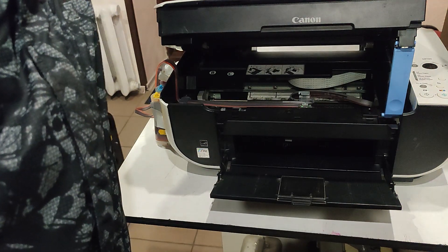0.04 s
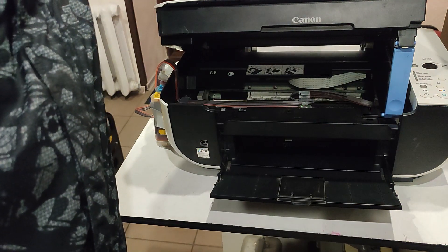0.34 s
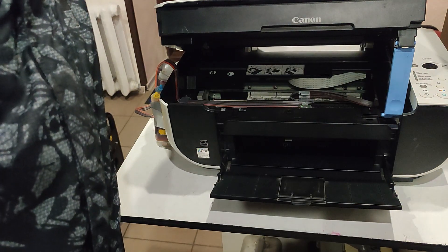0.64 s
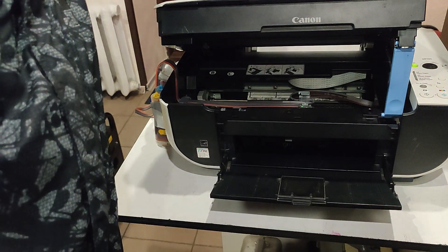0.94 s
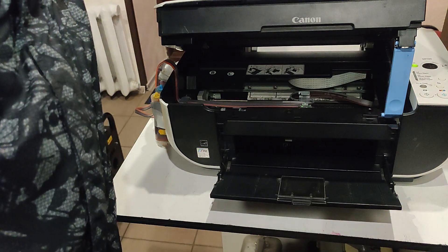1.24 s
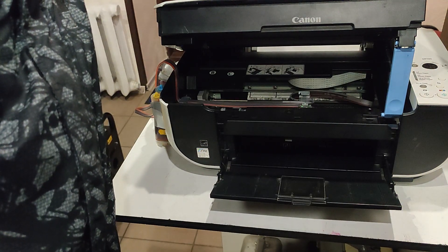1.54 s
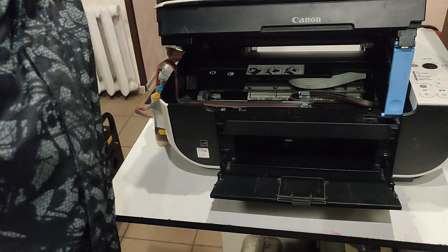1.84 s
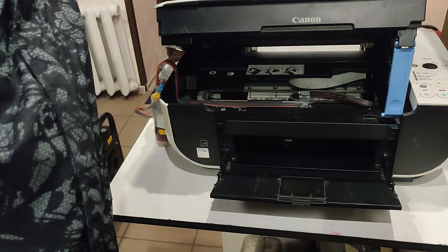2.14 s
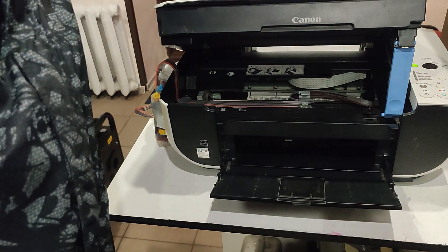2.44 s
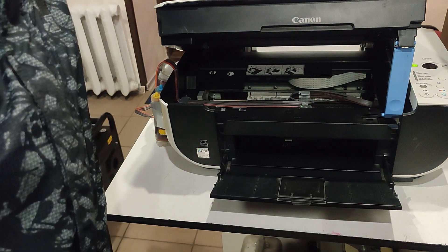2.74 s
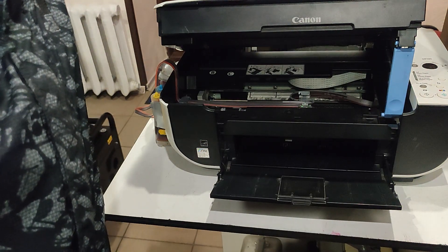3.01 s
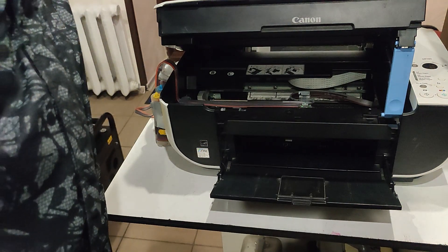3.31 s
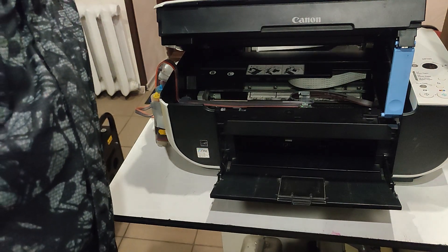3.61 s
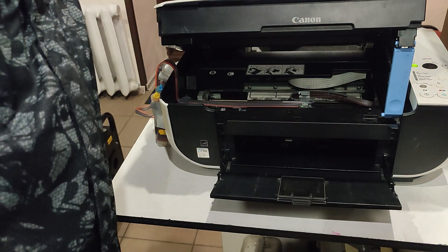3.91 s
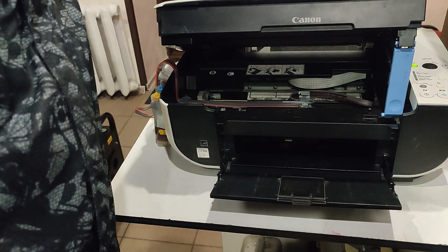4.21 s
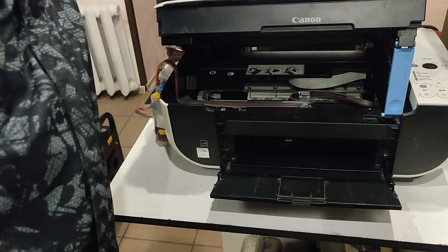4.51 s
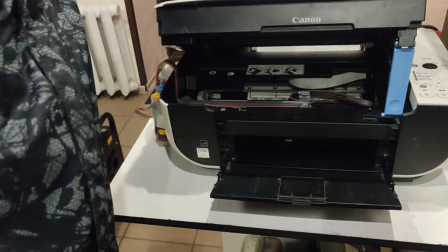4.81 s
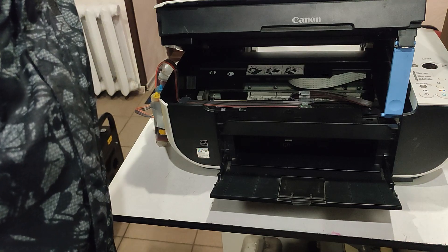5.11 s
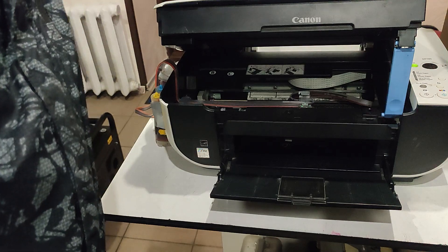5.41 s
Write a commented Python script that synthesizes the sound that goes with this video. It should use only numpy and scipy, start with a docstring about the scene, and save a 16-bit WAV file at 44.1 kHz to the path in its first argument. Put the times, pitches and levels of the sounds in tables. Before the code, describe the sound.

An open printer is handled close up, with paper and cloth rustling, short scrapes and scattered plastic knocks in a small room.

```python
"""A quick rustle and a sharp plastic knock: an open inkjet printer is handled on a table, close up.
Loose parts hit and chatter against the hollow housing, ringing its thin panels and low modes.
Short stick-slip strokes scrape along it; paper and cloth crackle, and sliding paper swishes.
A low rumble and a faint hum lie under the small room, all heard through a phone's two ports."""
import sys
import numpy as np
from scipy import signal
from scipy.fft import rfft, irfft
from scipy.io import wavfile

SR = 44100
rng = np.random.default_rng(int(sys.argv[2]) if len(sys.argv) > 2 else 0)


def to_wav(sig):
    """Store sig (one row per channel, or 1-D mono) as 16-bit WAV at the path in sys.argv[1].

    Samples outside -1..1 are clipped; the rate is SR.
    """
    pcm = np.clip(np.atleast_2d(sig), -1, 1) * 32767
    pcm = np.round(pcm).astype(np.int16)
    wavfile.write(sys.argv[1], SR, pcm.T)  # frames by channels


N = 244755
TIME = np.arange(N) / SR
RING = np.arange(SR // 2) / SR  # time axis of one ring-out

# hits on the housing: t/s, panel level/dB, weight (thump over panel)/dB,
# hardness (crack over panel)/dB, chatter length/ms
KNOCK_HITS = [(0.2112, -35.5, -5, -7.5, 2), (0.585, -66, -26, -1.5, 2.4), (0.7376, -70, 3.5, -14, 1.3),
              (0.8431, -53, -8, -9.5, 6.8), (1.0435, -39, 2, -1.5, 6.8), (1.333, -49.5, -11, -13, 0.73),
              (1.351, -55, -14, -5.5, 4.5), (1.370, -50.5, 3.5, -6, 12), (1.438, -60, -8, -12, 5.6),
              (1.52, -42.5, 10.5, -5.5, 7), (1.5308, -27, 2.5, -1, 12.9), (1.7365, -61, 2, -4.5, 7),
              (1.8529, -50, 1, -8.5, 7.5), (2.459, -53.5, 0, -4.5, 11.2), (3.142, -66.5, 1.5, -0.5, 5.7),
              (3.489, -60.5, -13, -10, 3.4), (3.6221, -53, -9, -5.5, 6.6), (4.103, -51, -29, 0, 6.9),
              (4.255, -51, -12, -4, 18), (4.4812, -63.5, -11, -5.5, 0.8), (4.676, -51, -7.5, -4.5, 6.6),
              (4.773, -59, -2, -8, 2.8), (5.0349, -60.5, -2, -0.5, 8.6), (5.087, -58, -4, 6, 4.5),
              (5.1207, -27, -23.5, -10.5, 0.51), (5.182, -52, -9, -20, 3.5)]
# resonances of the hollow housing: f/Hz, relative level/dB, t60/s
HOUSING_MODES = [(135, -22, 0.25), (173.2, -19, 0.26), (284, -5.5, 0.051), (300.4, 0.5, 0.094),
                 (430, -19.5, 0.2), (465.6, -3.5, 0.075), (570, -4, 0.064), (713, -11, 0.061),
                 (787, -12, 0.051), (850, -2.5, 0.02), (1054, -9.5, 0.066), (1396, -23.5, 0.059),
                 (1660, -35, 0.03), (1838, -8, 0.1), (2955, -2.5, 0.07), (3260, -28, 0.072),
                 (4880, -11.5, 0.11), (5400, -13, 0.19), (7850, -2, 0.078)]
# tone of the thin panels' crowded modes: f/Hz, relative level/dB
PANEL_SPECTRUM = [(80, -10), (200, -6.5), (450, -3.5), (1000, -7.5), (2000, -8.5), (3500, -10.5),
                  (6000, -13.5), (7500, -11), (9500, -19.5), (14500, -21.5)]
# strokes along the housing: t/s, length/s, scrape level/dB, rumble level before its trim/dB
SCRAPE_STROKES = [(0.0, 0.21, -76, -65), (0.22, 0.065, -62.5, -46), (0.60, 0.19, -68.5, -55),
                  (0.81, 0.18, -60.5, -48.5), (0.965, 0.093, -61, -43), (1.29, 0.13, -75, -51),
                  (1.73, 0.17, -73, -55.5), (2.19, 0.061, -81, -55.5), (2.46, 0.094, -78, -54.5),
                  (3.415, 0.071, -62, -52.5), (3.725, 0.11, -65, -53.5), (3.835, 0.047, -54.5, -52),
                  (3.93, 0.077, -64.5, -58), (4.09, .055, -52, -50.5), (4.15, 0.095, -61.5, -54),
                  (4.235, 0.046, -53, -50), (4.675, 0.046, -56.5, -51), (5.075, 0.13, -77, -54.5)]
# moves of paper and cloth: t/s, length/s, level before its trim/dB
RUSTLE_STROKES = [(-0.02, 0.3, -55), (0.10, 0.065, -49.5), (0.32, 0.16, -66), (0.575, 0.08, -57),
                  (0.66, 0.19, -62.5), (0.83, 0.27, -53.5), (1.44, 0.093, -72), (1.82, .2, -65),
                  (2.135, 0.088, -65), (2.48, 0.13, -62), (2.545, 0.017, -65), (2.78, 0.11, -60),
                  (2.87, 0.38, -64), (3.12, 0.054, -61.5), (3.375, 0.063, -55.5), (3.58, .3, -63),
                  (3.96, 0.031, -51.5), (4.045, 0.13, -57), (4.23, 0.051, -50.5), (4.42, 0.061, -57),
                  (4.60, .25, -62.5), (4.945, 0.11, -55.5), (5.28, 0.17, -65.5)]
# tone of the rustle: f/Hz, relative level/dB
RUSTLE_SPECTRUM = [(800, 8.5), (1800, 8.5), (3000, 9), (5000, 7.5), (6200, 6.5), (7400, 8.5), (8500, 2.5),
                   (10000, -2.5), (14500, -1.5)]
# quick slides of paper: peak t/s, half length/s, level/dB
PAPER_SWISHES = [(2.569, 0.012, -72), (3.81, 0.076, -81), (3.98, 0.026, -76), (4.067, 0.012, -64),
                 (5.375, 0.085, -73.5)]
# room tone: f/Hz, relative level/dB
ROOM_SPECTRUM = [(12, 13.5), (20, 8.5), (35, 5), (75, -7), (127, -6.5), (181, -13.5), (332, -12.5),
                 (392, -25.5), (476, -33), (897, -25.5), (7280, -32.5), (10100, -39), (13300, -32),
                 (14500, -39)]
# partials of the hum: f/Hz, level/dB
HUM_PARTIALS = [(118.4, -74.5), (349.9, -79.5)]
# how alike the two ports sound: f/Hz, correlation/0-1
PORT_LIKENESS = [(30, 0.02), (130, 0.4), (300, 0.8), (700, 0.54), (1500, 0.44), (4000, 0.06), (14000, 0)]


def knocks(weight_db_per_octave=85, hardness_db_per_octave=1.5):
    """Plastic parts hit the housing: heavier parts ring lower, harder contacts crack brighter."""
    out = np.zeros((2, N + len(RING)))
    for start_s, db, weight_db, hardness_db, chatter_ms in KNOCK_HITS:
        part_hz = 895 * 2 ** (-weight_db / weight_db_per_octave)
        corner_hz = 3130 + 15000 * 2 ** (min(hardness_db, 0) / hardness_db_per_octave)
        hit = knock(db, db + weight_db, db + hardness_db, chatter_ms / 1000, part_hz, corner_hz)
        start = int(start_s * SR)
        out[:, start:start + len(RING)] += hit
    return out[:, :N]


def knock(panel_db, thump_db, crack_db, chatter_s, part_hz, corner_hz, low_hz=580, high_hz=2600):
    """One blow and its rebounds in three layers: low thump, mid panel ring and bright crack."""
    loose = np.tanh((chatter_s / 0.006) ** 2)  # 0 firmly seated, 1 rattling free
    ring = panel(chatter(chatter_s, loose), part_hz, t60=0.15)
    thump = unit(band(ring.mean(axis=0), low_hz, "low", order=4))  # long waves reach both ports alike
    # a loose blow rocks the whole housing, a firm one only flexes a wall
    thump = thump + loose * undb(3) * housing_boom(chatter_s) + (1 - loose) * undb(1) * wall_flex()
    mids = band(ring, [low_hz, high_hz], "band")
    crack = band(ring, high_hz, "high")
    crack = band(crack, min(corner_hz, .45 * SR), "low", order=1)
    layers = [(thump, thump_db), (mids, panel_db), (crack, crack_db)]
    blow_s = 0.016  # each layer carries the energy of its level held this long
    return sum(unit(x) * undb(db) for x, db in layers) * np.sqrt(blow_s / RING[-1])


def chatter(length_s, loose, give=0.45, bounce=0.95, count=5):
    """Contact force: a loose part gives way on the first hit, then rebounds at uneven intervals."""
    force = np.zeros(len(RING))
    force[0] = 1 - give * loose
    rebound_at = (np.arange(count) + rng.uniform(0.18, 1, count)) / count * length_s * SR
    strength = bounce * loose * rng.uniform(0.22, 1, count)
    force[rebound_at.astype(int)] += strength * rng.choice([-1, 1], count)
    return force


def panel(force, part_hz, t60, part_db=5, tick_db=8, modes_db=-5):
    """Contacts tick and ring the struck part, the upper housing modes and the crowded panel modes."""
    part = undb(part_db) * fade(t60=0.013) * np.sin(2 * np.pi * part_hz * RING)
    modes = undb(modes_db) * band(housing_ring(), 520, "high")
    decay = fade(t60) + undb(tick_db) * fade(t60=0.0036)
    crowd = crowded_modes(force, decay, PANEL_SPECTRUM)
    return band(crowd + convolve(force, modes - part), 140, "high")  # thin panels radiate little bass


def housing_ring(spot_db=1.5, detune=0.006):
    """The hollow housing rings in its modes, a little differently at every spot."""
    chance = rng.standard_normal((len(HOUSING_MODES), 2))
    levels = undb(spot_db * chance[:, 0])
    tunings = 1 + detune * chance[:, 1]
    return sum(undb(db) * level * fade(t60) * np.sin(2 * np.pi * hz * tuning * RING)
               for (hz, db, t60), level, tuning in zip(HOUSING_MODES, levels, tunings))


def housing_boom(push_s, top_hz=600):
    """A long push sets the whole housing booming in its low modes."""
    onset = 1 - np.exp(-3 * RING / push_s)
    return unit(band(housing_ring() * onset, top_hz, "low", order=6))


def wall_flex(hz=430, t60=0.029):
    """The struck wall moves in and springs back, heavily damped."""
    return unit(-fade(t60) * np.sin(2 * np.pi * hz * RING))


def crowded_modes(force, decay, spectrum, ragged_db=1.5, spacing_hz=110):
    """Dense modes struck at ever new spots: the energies of the contacts add up to a coloured noise."""
    size = len(force)
    energy = np.maximum(convolve(force ** 2, decay ** 2), 0)
    # modes bunch by chance, leaving narrow peaks and dips
    bunches = rng.standard_normal(512)
    ragged = np.interp(np.fft.rfftfreq(size, 1 / SR) / spacing_hz, np.arange(len(bunches)), bunches)
    noise = colour(stereo_noise(size), over_hz(spectrum, size) + ragged_db * ragged)
    return np.sqrt(energy) * unit(noise)


def scraping(rumble_trim_db=-7.5, low_hz=600, high_hz=2000):
    """Sliding contact grates on the panels and stirs a hollow rumble in the housing."""
    force = slips(per_second=490)
    body = panel(force, part_hz=984, t60=0.062, part_db=-3, tick_db=-3, modes_db=-7.5)
    scrape_gain = strokes(SCRAPE_STROKES, attack_s=0.022, resting_db=-84)
    rumble_gain = strokes(SCRAPE_STROKES, attack_s=0.022, resting_db=-67, level_column=3)
    scrape = unit(band(body, [low_hz, high_hz], "band"))
    hollow = unit(body) + undb(-7) * unit(convolve(force, housing_ring()))
    rumble = unit(band(hollow, low_hz, "low", order=4))
    return scrape * scrape_gain + rumble * rumble_gain * undb(rumble_trim_db)


def slips(per_second, spread_db=1.5):
    """Stick-slip: tiny releases at random moments, a few stronger than the rest."""
    strength = undb(spread_db * np.minimum(rng.exponential(size=N), 4))
    released = rng.random(N) < per_second / SR
    return released * strength * rng.choice([-1, 1], N)


def strokes(rows, attack_s, resting_db, release_s=0.035, level_column=2):
    """Gain envelope: each stroke swells, holds and dies away above a light resting contact."""
    power = undb(resting_db) ** 2
    for row in rows:
        since, length = TIME - row[0], row[1]
        attack = np.clip(since / attack_s, 0, 1)
        release = np.exp(-np.maximum(since - length, 0) / release_s)
        power = power + (undb(row[level_column]) * attack * release) ** 2
    return np.sqrt(power)


def rustling(trim_db=-7, flicker_db=0.5):
    """Fibres of paper and cloth catch and let go in a fine, uneven crackle."""
    crackle = crowded_modes(slips(per_second=720), fade(t60=0.062), RUSTLE_SPECTRUM)
    motion = strokes(RUSTLE_STROKES, attack_s=0.013, resting_db=-75.5)
    flicker = undb(-flicker_db * wander(hz=25))
    return unit(crackle * flicker) * motion * undb(trim_db)


def swishing(band_hz=(6750, 7850), flicker_db=6):
    """Paper sliding fast over an edge gives a narrow, fluttering hiss."""
    swell = sum(undb(db) * np.exp(-((TIME - peak_s) / half_s) ** 2)
                for peak_s, half_s, db in PAPER_SWISHES)
    hiss = unit(band(stereo_noise(N), band_hz, "band", order=2))
    return hiss * swell * undb(flicker_db * wander(hz=29))


def room(x, wet_db=-14, low_t60=0.16, high_t60=0.24, split_hz=900, build_s=0.014):
    """Reflections of a small furnished room: a short tail whose top hangs on a little longer."""
    noise = stereo_noise(len(RING))
    lows = band(noise, split_hz, "low", order=1) * fade(low_t60)
    highs = band(noise, split_hz, "high", order=1) * fade(high_t60)
    tail = (lows + highs) * (1 - np.exp(-(RING / build_s) ** 2))
    return x + undb(wet_db) * convolve(x, unit(tail) / np.sqrt(len(RING)))


def hum(waver_rad=0.1):
    """A faint hum whose partials waver slightly in phase."""
    return sum(undb(db) * np.sqrt(2) * np.sin(2 * np.pi * hz * TIME + waver_rad * wander(hz=1.1))
               for hz, db in HUM_PARTIALS)


def room_rumble(bed_db=-59, throb_db=2):
    """A bed of low room tone whose bass throbs unevenly."""
    bed = unit(colour(stereo_noise(N), over_hz(ROOM_SPECTRUM, N))) * undb(bed_db)
    bass = band(bed, 110, "low", order=1)
    return bed + bass * (undb(throb_db * wander(hz=4.9)) - 1)


def stereo_noise(size):
    """White noise at two ports: most alike in the low mids, wide in the deep bass and the treble."""
    alike = over_hz(PORT_LIKENESS, size)
    mid, side = rfft(rng.standard_normal((2, size)))
    mid, side = mid * np.sqrt((1 + alike) / 2), side * np.sqrt((1 - alike) / 2)
    return irfft(np.array([mid + side, mid - side]), size)


def wander(hz):
    """Random drift below hz, at rms 1."""
    return unit(band(rng.standard_normal(N), hz, "low", order=2))


def fade(t60):
    """Ring-out envelope, 60 dB down after t60 seconds."""
    return np.exp(-np.log(1000) * RING / t60)


def band(x, hz, kind, order=3):
    """Causal Butterworth filter."""
    return signal.sosfilt(signal.butter(order, hz, kind, fs=SR, output="sos"), x)


def over_hz(points, size):
    """A curve through the points on a log-frequency axis, one value per FFT bin."""
    hz, value = np.transpose(points)
    return np.interp(np.log(np.fft.rfftfreq(size, 1 / SR) + 1), np.log(hz), value)


def colour(x, curve_db):
    """EQ a signal with one gain per FFT bin."""
    return irfft(rfft(x) * undb(curve_db), x.shape[-1])


def convolve(x, response):
    """Play a signal through a mono or stereo impulse response."""
    return signal.fftconvolve(np.atleast_2d(x), np.atleast_2d(response), axes=1)[:, :x.shape[-1]]


def undb(db):
    """Decibels to gain."""
    return 10 ** (np.asarray(db) / 20)


def unit(x):
    """Scale to rms 1."""
    return x / np.sqrt(np.mean(x ** 2))


def scene(pan_db=1.54, shade_hz=700, lag_samples=3):
    """The printer sits a little to the right: the left port hears it later and duller."""
    left, right = room(knocks() + scraping() + rustling() + swishing())
    left = np.pad(left, (lag_samples, 0))[:N]
    left = left + (undb(-pan_db / 2) - 1) * band(left, shade_hz, "high", order=1)
    right = right + (undb(pan_db / 2) - 1) * band(right, shade_hz, "high", order=1)
    return np.array([left, right]) + hum() + room_rumble()


def record(dry):
    """The phone cuts the top end steeply above 14350 Hz."""
    return signal.sosfilt(signal.ellip(10, .2, 70, 14350, fs=SR, output="sos"), dry)


dry = scene()
out = record(dry)
to_wav(out)
```